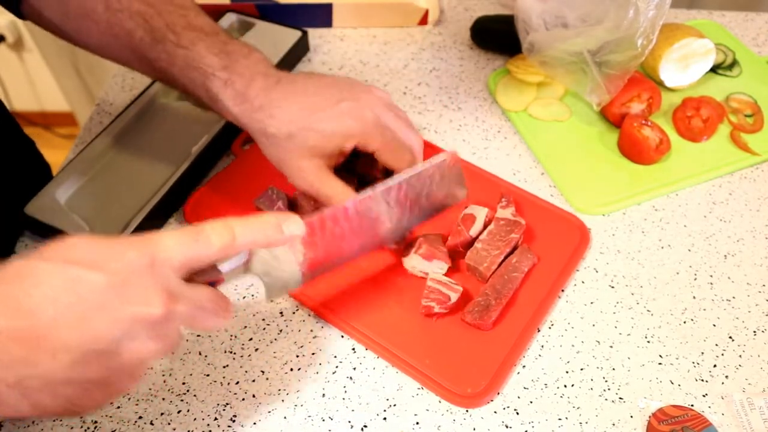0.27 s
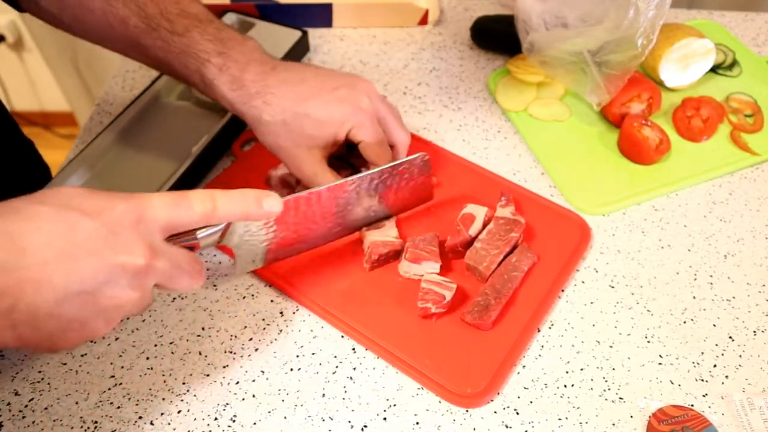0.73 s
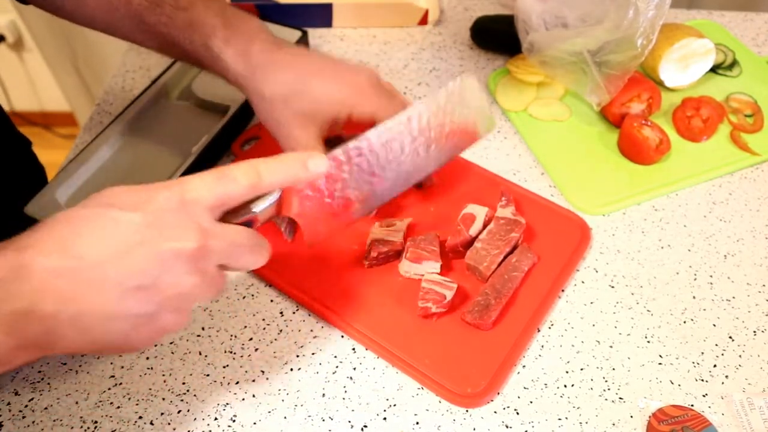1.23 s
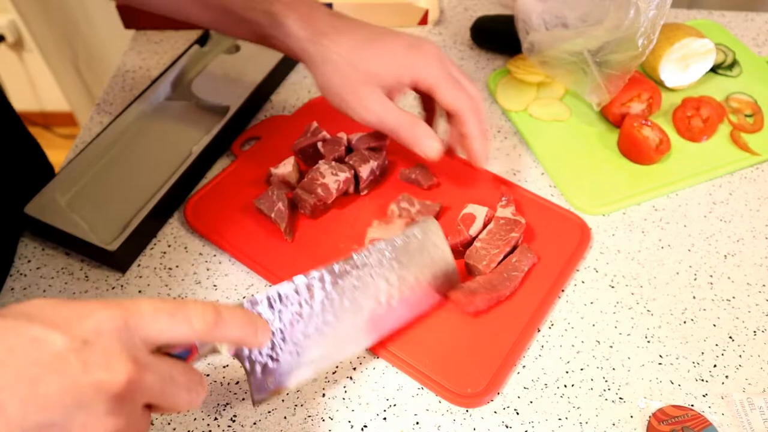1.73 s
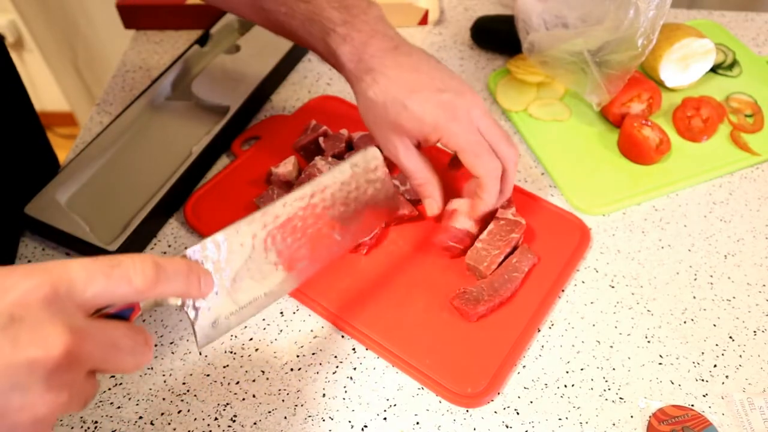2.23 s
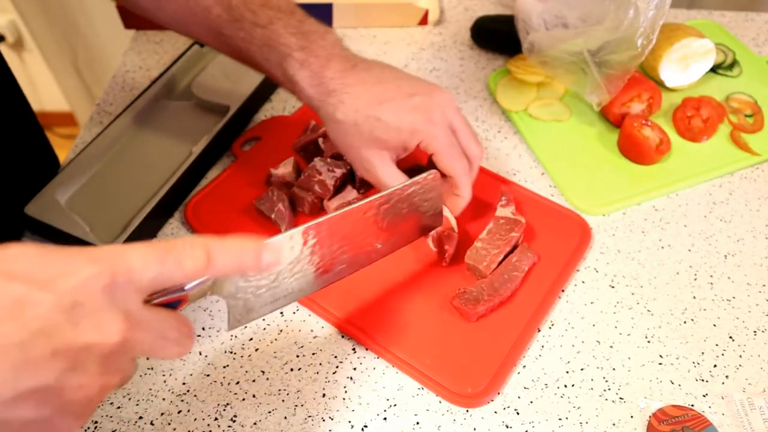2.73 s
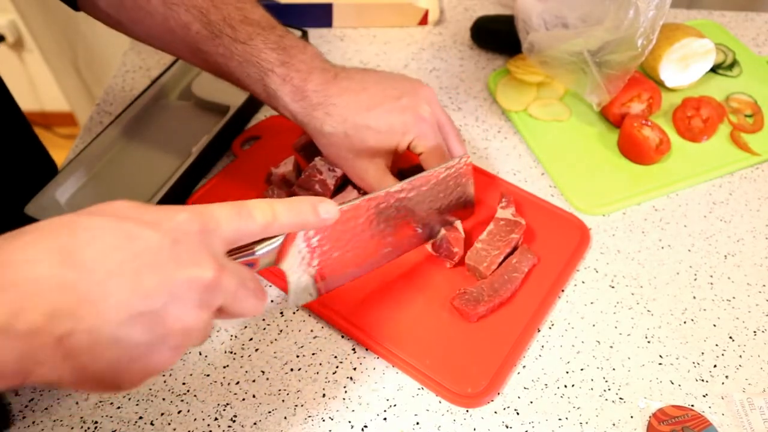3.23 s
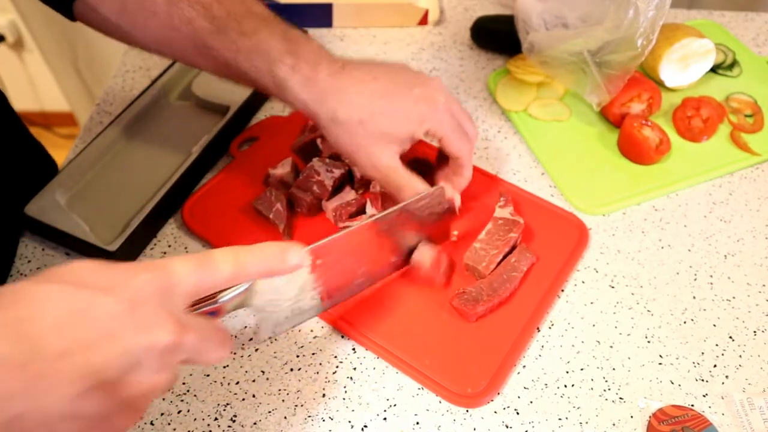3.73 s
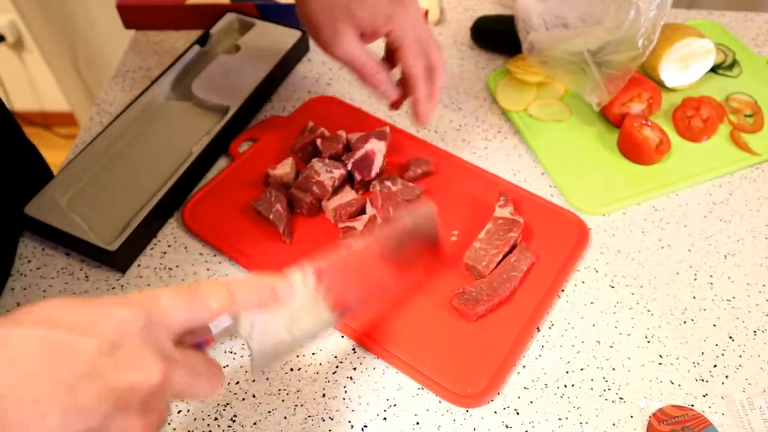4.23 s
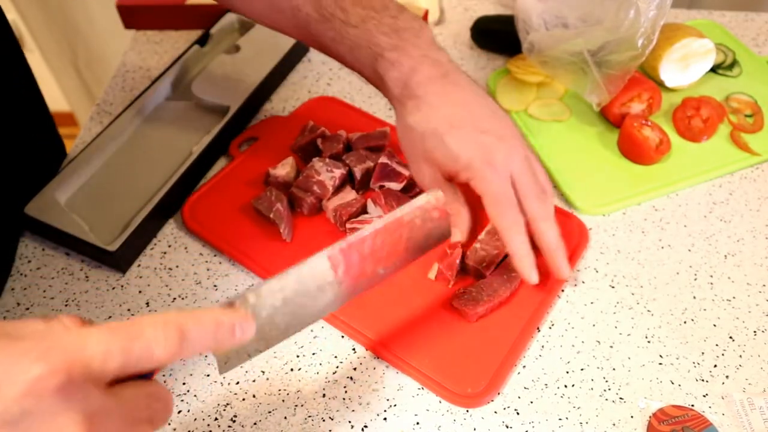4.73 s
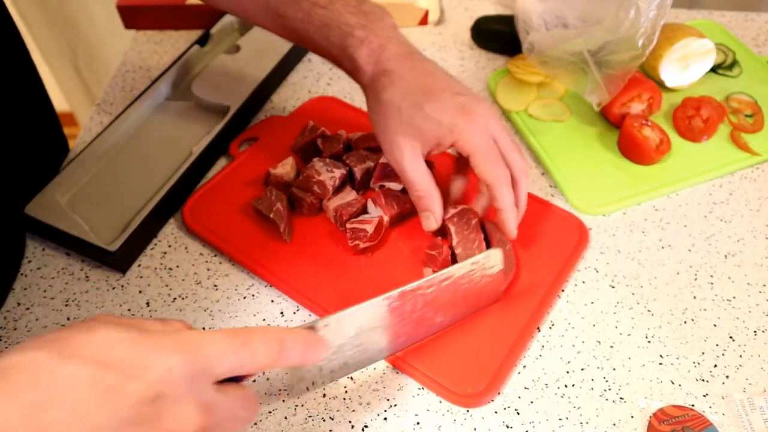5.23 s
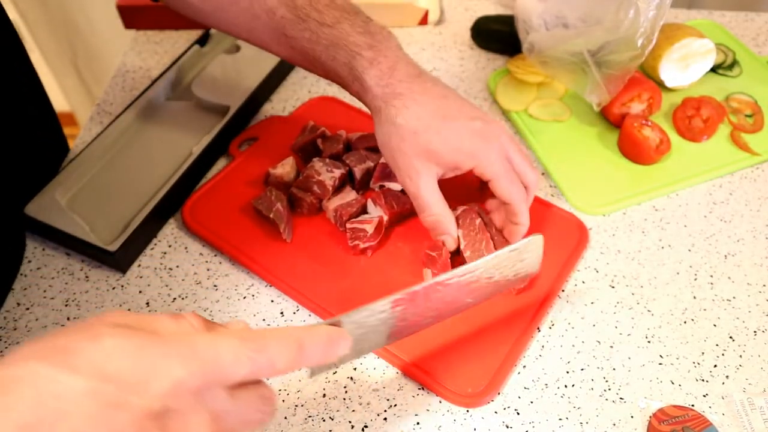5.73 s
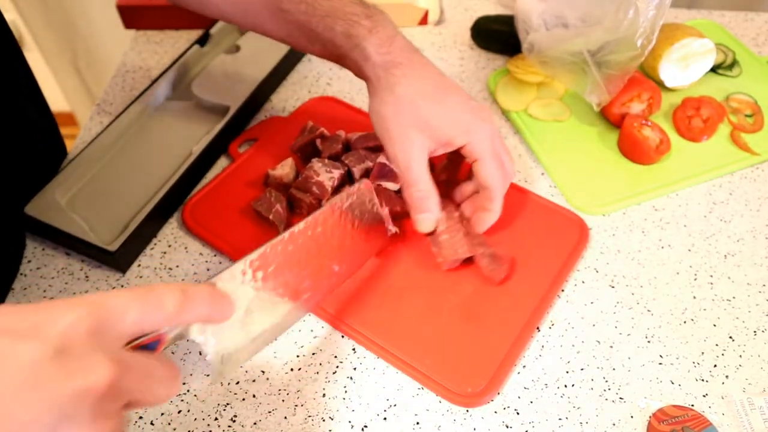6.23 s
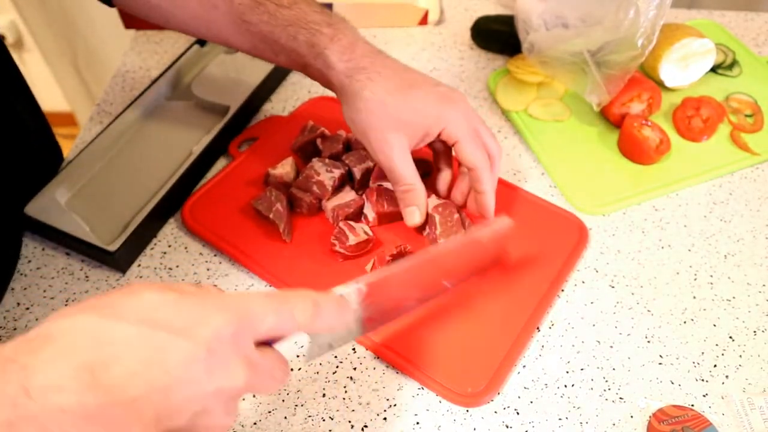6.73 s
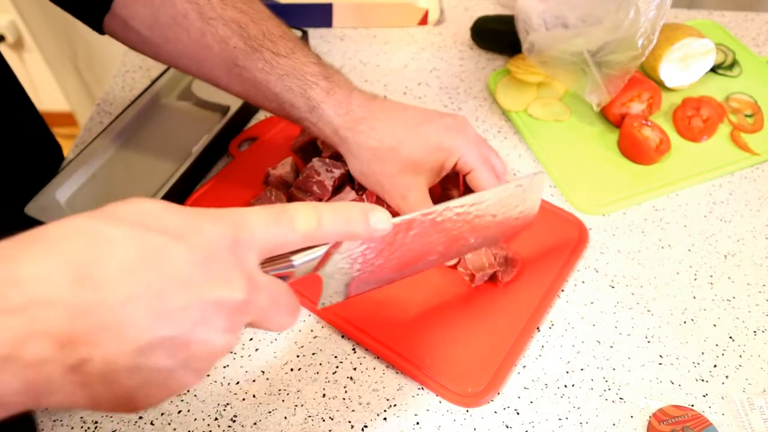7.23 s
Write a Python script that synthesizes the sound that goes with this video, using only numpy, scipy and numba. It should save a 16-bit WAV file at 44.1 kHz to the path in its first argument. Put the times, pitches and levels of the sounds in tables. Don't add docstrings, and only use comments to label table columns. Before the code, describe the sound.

A heavy blade chops wet meat on a plastic board, with hard knocks, gritty scrapes, brief steel ringing and a quiet refrigerator hum.

```python
import sys
import numpy as np
from scipy import signal
from scipy.fft import rfft, irfft
from scipy.io import wavfile
from scipy.ndimage import uniform_filter1d
from numba import njit

SR = 44100
rng = np.random.default_rng(int(sys.argv[2]) if len(sys.argv) > 2 else 0)


def wrap_up_sound(samples):
    columns = np.atleast_2d(samples).T
    tamed = np.clip(columns, -1, 1)
    steps = np.round(tamed * 32767).astype(np.int16)
    wavfile.write(sys.argv[1], SR, steps)


def natural_amplitude(level_db):
    exponent = np.asarray(level_db, float) / 20
    return 10 ** exponent


N = 330288
LEAD = int(0.05 * SR)

# frequency in Hz, level in dB, t60 in s.
BOARD_MODES = [(441, -10, .05), (490, -9, .05), (590, -7, .04), (690, -6, .04), (786, -5, .05),
               (850, -8, .04), (914, -1, .085), (985, -6, .04), (1065, -7, .05), (1180, -8, .03),
               (1290, -4, .05), (1357, -1, .09), (1450, -9, .03), (1626, -10, .04), (1730, -7, .05),
               (1830, -10, .03), (2050, -7, .03), (2283, -5, .035), (2520, -8, .025), (2815, -10, .02),
               (3300, -12, .02), (3900, -14, .015)]
# frequency in Hz, level in dB touched at the edge,
# level in dB touched at the flat, t60 in s.
STEEL_MODES = [(2519, 0, -10, .11), (3278, -6, -11, .09), (4134, -12, -8, .12), (4673, -20, -14, .12),
               (5033, -10, -10, .05), (5722, -1, -16, .2), (6374, -2, -5, .24), (7000, -16, -4, .08),
               (7300, -16, -6, .2), (8516, -2, -4, .1), (9100, -16, -10, .1), (10080, -6, -10, .09),
               (10450, -18, -2, .05), (11550, -18, -4, .06), (12270, -20, -16, .08), (13040, -24, -10, .06),
               (14450, -26, -7, .04), (14900, -26, -12, .04)]
# start in s, peak in dB, counter thud in dB re peak,
# edge crack in dB re peak, contact in ms.
CHOP_BLOWS = [
    (0.944, -4, -17, -27, 0.064),
    (3.453, 0, -11.5, -13, 0.058),
    (4.294, 0, -12.5, -13.5, 0.066),
    (4.876, -8, -7.5, -31, 0.088),
    (5.133, 4.5, -15.5, -11.5, 0.042),
    (6.031, 5, -20, -10.5, 0.02),
    (6.093, -8.5, -26, -40, 0.033),
    (6.794, 3, -12, -3.5, 0.042),
]


def unit(x):
    return x / np.sqrt(np.mean(x ** 2))


def peak_1(x):
    return x / np.abs(x).max()


def band(x, hz, width_hz):
    return signal.lfilter(*signal.iirpeak(min(hz, 0.45 * SR), hz / width_hz, fs=SR), x)


def steep(x, hz, width_hz):
    return band(band(x, hz, width_hz), hz, width_hz)


def dull(x, hz):
    return signal.sosfilt(signal.butter(4, min(hz, 0.45 * SR), fs=SR, output="sos"), x)


def soften(x, contact_ms):
    pole = np.exp(-1000 / (max(contact_ms, 0.01) * SR))
    return peak_1(signal.lfilter([1], [1, -2 * pole, pole * pole], x))


def walk(rate_hz):
    hold = int(SR / rate_hz)
    steps = np.repeat(rng.standard_normal(N // hold + 1), hold)
    return unit(uniform_filter1d(uniform_filter1d(steps, hold), hold)[:N])


def wander(db):
    return natural_amplitude(db * np.clip(walk(22), -1.5, 1.5))


def ring(modes, t, chance, scatter_db, detune):
    hz, db, t60 = np.transpose(modes)[:, :, None]
    size, pitch, sign = chance[:3 * len(modes)].reshape(3, -1, 1)
    fade = np.sign(sign) * natural_amplitude(db + scatter_db * size - 60 * t / t60)
    return peak_1((fade * np.sin(2 * np.pi * hz * (1 + detune * pitch) * t)).sum(axis=0))


def add(track, s, sound):
    i = int(s * SR) + LEAD
    track[i:i + len(sound)] += sound[:len(track) - i]


@njit
def follow(x, attack, release):
    e, y = 0., np.empty(len(x))
    for i in range(len(x)):
        e += (abs(x[i]) - e) * (attack if abs(x[i]) > e else release)
        y[i] = e
    return y


def kitchen():
    # frequency in Hz, level in dB per Hz.
    floor_spectrum = [(12, -24.5), (20, -13), (35, 2), (52, -9.5), (75, -3), (120, -8), (200, -3.5),
                      (255, -5.5), (320, -10), (480, -13), (870, -17.5), (1440, -22.5), (5080, -25),
                      (16000, -31)]
    # frequency in Hz, level in dB, flicker in dB.
    hum_lines = [(37.7, -66, 4), (118.4, -62, 1.5), (258, -57, 1.5)]
    floor_db = -51.5
    hz, db = np.transpose(floor_spectrum)
    f = np.fft.rfftfreq(N, 1 / SR) + 1
    shape = natural_amplitude(np.interp(np.log(f), np.log(hz), db))
    out = natural_amplitude(floor_db) * unit(irfft(rfft(rng.standard_normal(N)) * shape, N))
    for line_hz, line_db, flicker_db in hum_lines:
        level = natural_amplitude(line_db + flicker_db * walk(6))
        phase = 2 * np.pi * np.cumsum(line_hz * (1 + 0.004 * walk(5))) / SR
        out += level * unit(np.sin(phase))
    return out


def room(x):
    # frequency in Hz, t60 in s, level in dB.
    echo_bands = [(100, 0.27, -27.5), (225.5, 0.27, -13.5), (508, 0.22, -9), (985, 0.46, -16),
                  (2160, 0.41, -11), (4020, 0.29, -7), (7000, 0.45, -8), (12000, 0.12, -35.5)]
    t = np.arange(int(0.8 * SR)) / SR
    echo = np.zeros(len(t))
    for hz, t60, db in echo_bands:
        echo += steep(rng.standard_normal(len(t)), hz, hz) * natural_amplitude(db - 60 * t / t60) / np.sqrt(t60 * hz)
    echo *= np.clip((t - 0.004) / 0.0034, 0, 1)
    return x + signal.fftconvolve(x, echo)[:len(x)]


def thumps():
    # frequency in Hz, level in dB, t60 in s.
    cupboard_modes = [(31.9, -8.5, 0.62), (58, -19, 0.18), (83.7, 4, 0.14)]
    # start in s, peak in dB.
    shakes = [(-.012, -29), (0.485, -51), (0.817, -32.5), (0.944, -34), (1.085, -31), (1.779, -27),
              (2.512, -40), (3.194, -30), (3.454, -29.5), (3.931, -36), (4.294, -49), (4.406, -32.5),
              (4.876, -25), (5.134, -32), (5.382, -33), (5.656, -34), (5.79, -36.5), (6.031, -42),
              (6.794, -30), (6.903, -36), (7.133, -38.5)]
    out, t = np.zeros(N + LEAD), np.arange(int(0.25 * SR)) / SR
    envelope = (1 - np.exp(-t / 0.0047)) * np.cos(2 * np.pi * t)
    for s, peak_db in shakes:
        thump = ring(cupboard_modes, t, rng.standard_normal(9), scatter_db=3.5, detune=0.044)
        add(out, s, natural_amplitude(peak_db) * thump * envelope)
    return out


def clicks():
    # start in s, peak in dB, pitch in Hz.
    wet_clicks = [(0.4864, -42, 5100), (0.9233, -41, 3320), (1.742, -40, 5570), (1.8148, -36, 8850),
                  (2.049, -39.5, 5970), (2.331, -44, 5940), (2.361, -42.5, 6860), (2.48, -45.5, 4600),
                  (2.6449, -46, 7570), (2.71, -48, 6650), (2.825, -44, 7790), (3.1775, -35.5, 7500),
                  (3.2683, -44, 4630), (3.3363, -41.5, 5700), (3.3952, -37.5, 7000), (3.422, -36, 5870),
                  (3.444, -29, 3970), (4.423, -42, 4340), (4.9182, -27.5, 3720), (5.7194, -46.5, 3950),
                  (5.768, -37, 1200), (6.0337, -2, 3600), (7.2194, -52, 4260)]
    out, t = np.zeros(N + LEAD), np.arange(int(0.034 * SR)) / SR
    for s, peak_db, hz in wet_clicks:
        crackle = rng.standard_normal(len(t)) * natural_amplitude(-60 * t / 0.026)
        grain = dull(steep(crackle, hz, 1.24 * hz), 1.9 * hz)
        add(out, s, natural_amplitude(peak_db) * peak_1(grain))
    return out


def squeaks():
    # start in s, length in s, level in dB, pitch in Hz.
    streaks = [
        (1.046, 0.036, -49, 3910),
        (1.15, .04, -55, 3340),
        (1.88, .1, -61, 4500),
        (3.71, 0.078, -47, 2360),
        (3.77, 0.051, -53, 3740),
        (3.795, 0.078, -48.5, 7600),
        (3.818, 0.069, -48, 4760),
        (5.29, .05, -54, 10550),
    ]
    width_hz = 90
    out = np.zeros(N + LEAD)
    for s, length_s, db, hz in streaks:
        n = int(length_s * SR)
        streak = unit(steep(rng.standard_normal(n), hz, width_hz))
        add(out, s, natural_amplitude(db) * streak * np.sqrt(np.hanning(n)))
    return out


def rips():
    length_s, level_db = 0.01, -42
    out, n = np.zeros(N + LEAD), int(length_s * SR)
    for s, peak_db, *_ in CHOP_BLOWS[1:3]:
        tear = unit(steep(rng.standard_normal(n), 2500, 5000))
        add(out, s - length_s, natural_amplitude(peak_db + level_db) * tear * np.linspace(0, 1, n))
    return out


def drags():
    # frequency in Hz, width in Hz, level in dB.
    held_modes = [(2385, 110, -3), (2800, 250, -7), (3200, 250, -6), (3820, 200, -3), (4650, 200, -4),
                  (5200, 300, -9), (5760, 200, -7), (6300, 300, -6), (6900, 300, -8), (7500, 250, -6),
                  (7900, 250, -7), (8700, 400, -10), (9500, 400, -14)]
    # start in s, length in s, held steel in dB, board in dB re held, free ring in dB re held.
    pulls = [(0.079, 0.26, -59, 2.5, -50), (0.83, 0.18, -63, 12, -23), (0.975, 0.1, -52, 10, -25),
             (1.021, 0.22, -48.5, -0.5, -25), (1.054, 0.11, -45.5, 6, -25), (1.84, 0.24, -63.5, 6.5, -9),
             (1.933, 0.14, -58, -13, -14), (3.336, 0.23, -59, 0.5, -6), (3.651, .24, -45.5, 2, -28),
             (3.778, .11, -54.5, -15, -14.5), (4.41, 0.055, -62, -5, 3), (4.965, 0.098, -36.5, -1, -47),
             (5.294, 0.11, -39.5, 1.5, -35), (5.345, 0.1, -61.5, 21, -31), (5.801, 0.19, -50.5, 0, -47),
             (6.057, 0.075, -35, 4, -31), (6.107, 0.093, -34, 1, -3.5), (6.292, 0.52, -61.5, -2, -39),
             (7.204, 0.11, -65, -10, -12)]
    attack_s, release_s = 0.017, 0.05
    board_tilt_db_per_octave, uneven_db, top_hz = -2, 1.5, 11500
    bright_db_per_db, usual_ring_db = 0.3836, -16.5
    t = np.arange(N) / SR
    trips = rng.standard_normal(N) * natural_amplitude(2.2 * rng.exponential(size=N) + 1.1 * walk(150))

    parts = [natural_amplitude(db) * wander(4) * band(band(trips, hz, width_hz), hz, 5 * width_hz)
             for hz, width_hz, db in held_modes]
    size = np.sqrt(np.mean(sum(parts) ** 2))
    held = sum(parts[:8]) / size + 0.77 * unit(dull(steep(trips, 2300, 7200), 7000))
    upper = sum(parts[8:]) / size + 0.35 * unit(dull(steep(trips, 7500, 6800), 9100))

    board = np.zeros(N)
    for hz, db, _ in BOARD_MODES[6:17]:
        level = natural_amplitude(db + board_tilt_db_per_octave * np.log2(hz / 1000)) * wander(3.5)
        board += level * band(band(trips, hz, 90), hz, 500)
    board = unit(board)

    free = np.zeros(N)
    for hz, _, flat_db, _ in STEEL_MODES[5:16]:
        free += natural_amplitude(flat_db) * wander(3) * band(band(trips, hz, 50), hz, 800)
    free = unit(free)

    out = np.zeros(N)
    for s, length_s, held_db, board_db, free_db in pulls:
        gate = np.clip(np.minimum((t - s) / attack_s, (s + length_s - t) / release_s), 0, 1) ** 2
        bright = natural_amplitude(bright_db_per_db * (free_db - usual_ring_db))
        out += gate * natural_amplitude(held_db) * (held + bright * upper + natural_amplitude(board_db) * board + natural_amplitude(free_db) * free)
    return np.r_[np.zeros(LEAD), dull(out * wander(uneven_db), top_hz)]


def sings():
    # start in s, peak in dB, place from 0 edge to 1 flat, damping factor.
    touches = [
        (5.134, -39, .6, 2.1),
        (5.278, -39.5, .1, 1.7),
        (6.035, -47, .3, 2.5),
        (6.162, -12, .02, 1.13),
        (6.258, -10, 0.73, 2.5),
        (6.793, -15, 0.59, 2.4),
        (7.044, -54, 0.091, 0.59),
    ]
    rough = 0.24
    out, t = np.zeros(N + LEAD), np.arange(int(0.5 * SR)) / SR
    for (s, peak_db, place, damping), later in zip(touches, touches[1:] + [(N,)]):
        modes = [(hz, edge_db + place * (flat_db - edge_db), t60 / damping)
                 for hz, edge_db, flat_db, t60 in STEEL_MODES]
        steel = ring(modes, t, rng.standard_normal(60), scatter_db=1, detune=0.0003)
        steel *= 1 + rough * unit(band(rng.standard_normal(len(t)), 85.5, 200))
        stop = np.clip(1 + (later[0] - s - t) / 0.01, 0, 1)
        add(out, s, natural_amplitude(peak_db) * steel * stop)
    return out


def board_knock(t, contact_ms, chance, noise):
    tilt_db_per_octave, chatter, low_hz = 1, 0.44, 263
    damping = 0.88 * (1 + 4 * contact_ms)
    modes = [(hz, db + tilt_db_per_octave * np.log2(hz / 1000), t60 / damping) for hz, db, t60 in BOARD_MODES]
    rattle_db = -11.5 + 2.5 * contact_ms
    rattle = steep(noise[0], 1300, 2080) * natural_amplitude(rattle_db - 60 * t / 0.24) * (1 - np.exp(-t / 0.00069))
    rough = 1 + chatter * unit(band(noise[1], 58, 120)) * (1 - np.exp(-t / 0.0061))
    knock = soften(ring(modes, t, chance, scatter_db=2.5, detune=0.012) * rough + rattle, contact_ms)
    knock = signal.lfilter(*signal.butter(2, low_hz, "high", fs=SR), knock)
    return -knock * np.sign(knock[:12].sum())


def counter_thud(t, contact_ms, chance):
    # frequency in Hz, level in dB, t60 in s.
    counter_modes = [(121, -20.5, 0.51), (173, 0, 0.13), (194, -23.5, 0.11), (210.1, 8, 0.098),
                     (229.8, -4.5, 0.17), (273.7, 7, 0.071), (319.5, -10.5, 0.27)]
    damping = 0.22 + 1.5 * contact_ms
    envelope = (1 - np.exp(-t / 0.00083)) * natural_amplitude(-60 * t * damping / 0.24)
    return ring(counter_modes, t, chance, scatter_db=5, detune=0.017) * envelope


def edge_crack(t, noise):
    return peak_1(dull(steep(noise * natural_amplitude(-60 * t / 0.019), 2900, 5400), 7700))


def blows():
    earlier = [
        (-.012, -0.5, -15, -9.5, 0.05),
    ]
    taps = [(0.484, -39.5, 3, -0.5, 0.087), (0.82, -20, -2, -22, 0.31), (1.085, -16, -5.5, -37, 0.14),
            (1.781, -16.5, -2.5, -35, 0.3), (2.511, -30.5, -5, -24, 0.48), (2.709, -44.5, -15, 2, 0.19),
            (3.195, -17, -7, -21, 0.36), (3.93, -22.5, -4.5, -36.5, 0.69), (4.406, -19.5, -4.5, -35, 0.32),
            (4.648, -43, -6, -1, 0.16), (5.381, -19.5, -3, -13, 0.38), (5.656, -23.5, -0.5, -28, 0.31),
            (5.79, -28, 0, -12.5, 0.43), (5.822, -22.5, -5.5, 4, 0.041), (6.161, -15.5, -41, -4, 0.04),
            (6.257, -20, -11, 8, 0.048), (6.905, -21, -12.5, -33, 0.21), (7.134, -27.5, -2.5, -36, 0.48)]
    # start in s, peak in dB, counter thud in dB re peak.
    rock_backs = [(0.976, -10.5, -4.5), (1.13, -26.5, -3), (1.82, -34.5, -4), (2.547, -48, 7),
                  (3.23, -42.5, 11.5), (3.489, -30, -11), (3.969, -47, 10.5), (4.328, -28, 12),
                  (4.909, -27, -0.5), (5.178, -13, -2), (5.233, -22, -16), (5.689, -54, 2),
                  (6.074, -27, 11.5), (6.836, -20.5, 8), (7.169, -58, 2.5)]
    rock_crack_db, rock_contact_ms = -42.5, 0.48
    rocks = [(s, peak_db, thud_db, rock_crack_db, rock_contact_ms) for s, peak_db, thud_db in rock_backs]
    out, t = np.zeros(N + LEAD), np.arange(int(0.25 * SR)) / SR
    for s, peak_db, thud_db, crack_db, contact_ms in earlier + CHOP_BLOWS + taps + rocks:
        chance, noise = rng.standard_normal(100), rng.standard_normal((2, len(t)))
        knock = board_knock(t, contact_ms, chance, noise)
        thud = natural_amplitude(thud_db) * counter_thud(t, contact_ms, chance[66:])
        crack = natural_amplitude(crack_db) * edge_crack(t, noise[1])
        add(out, s, natural_amplitude(peak_db) * (knock + thud + crack))
    return out


def scene():
    work = thumps() + clicks() + squeaks() + rips() + drags() + sings() + blows()
    return (room(work)[LEAD:] + kitchen())[None]


def roll_off(x):
    return signal.sosfilt(signal.butter(12, 15900, fs=SR, output="sos"), x)


def record(dry):
    threshold_db, ratio_power = -16.5, 0.39
    level = follow(dry[0], 1 / (0.0031 * SR), 1 / (0.065 * SR))
    level = follow(level, 1 / (0.0054 * SR), 1 / (0.0051 * SR))
    gain = np.minimum(1, natural_amplitude(threshold_db) / (level + 1e-9)) ** ratio_power
    return roll_off(np.clip(dry * gain, -1, 1))


dry = scene()
out = record(dry)
wrap_up_sound(out)
```